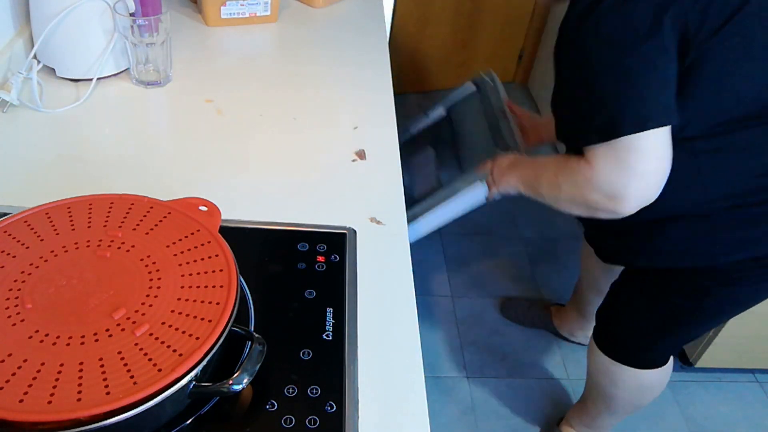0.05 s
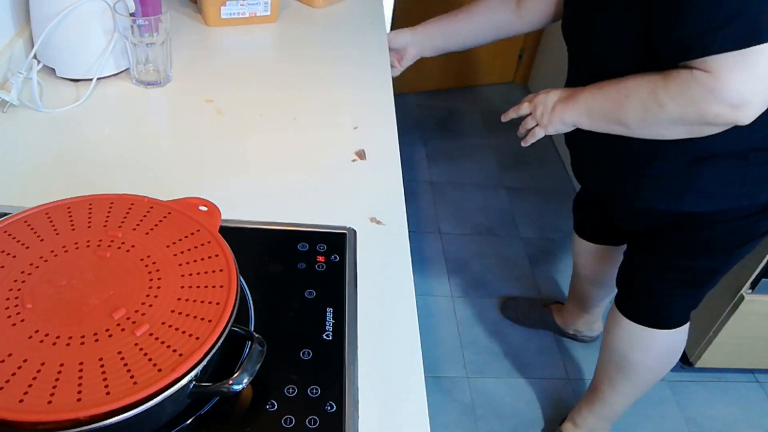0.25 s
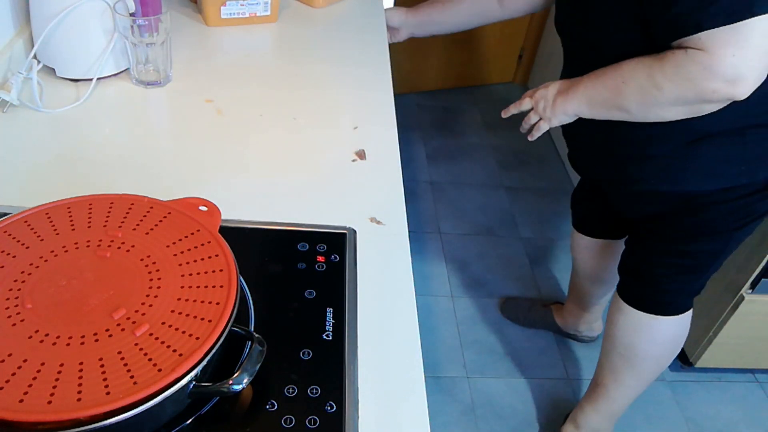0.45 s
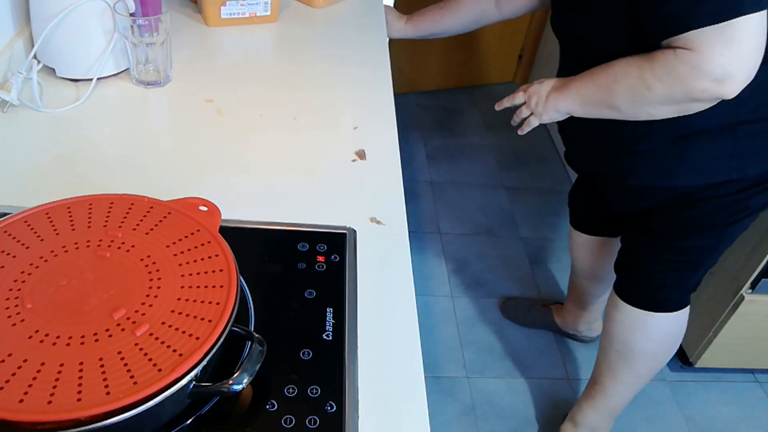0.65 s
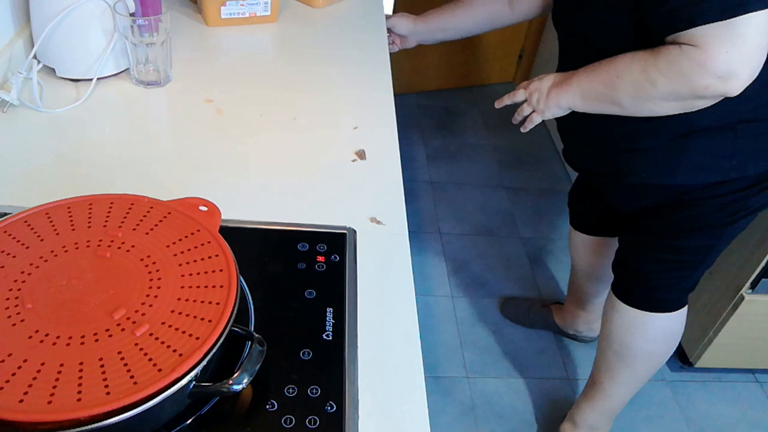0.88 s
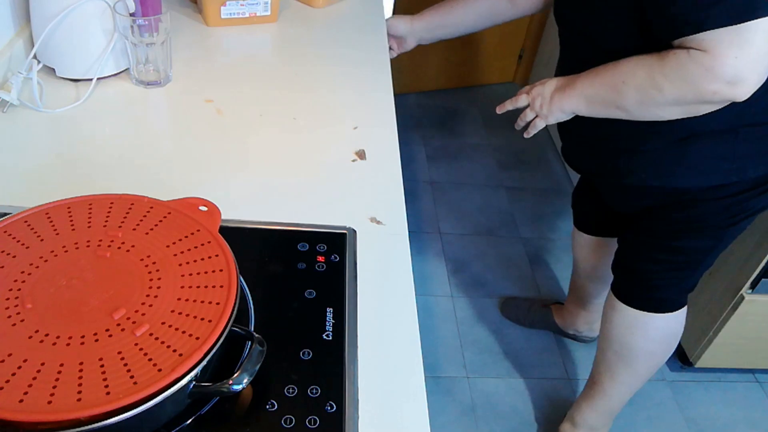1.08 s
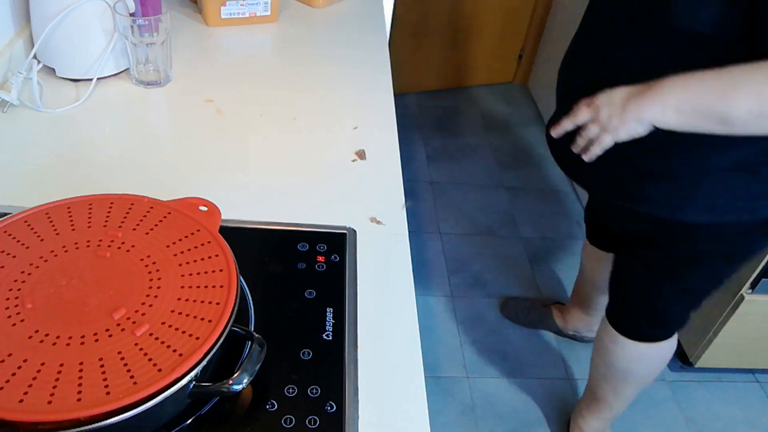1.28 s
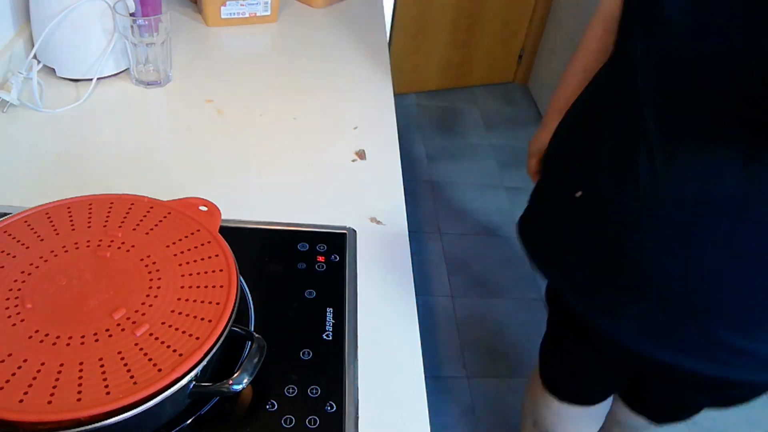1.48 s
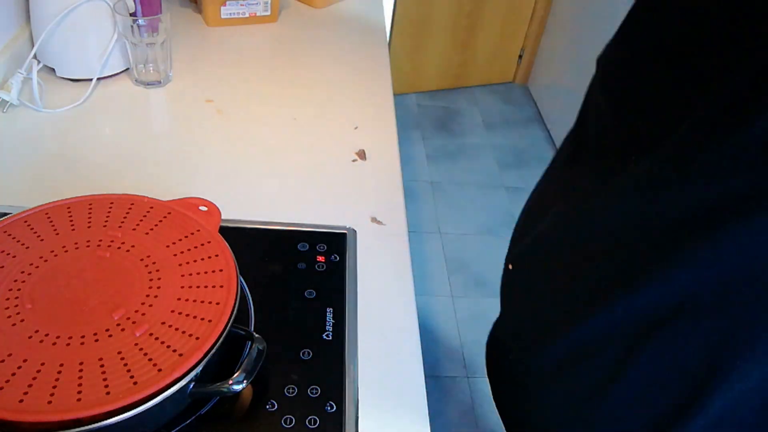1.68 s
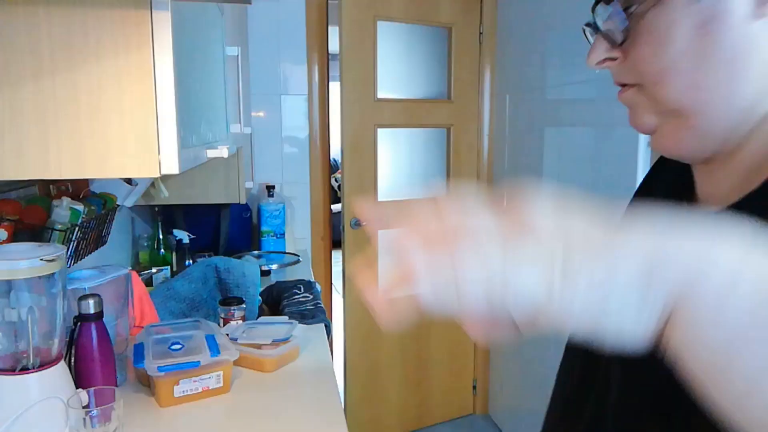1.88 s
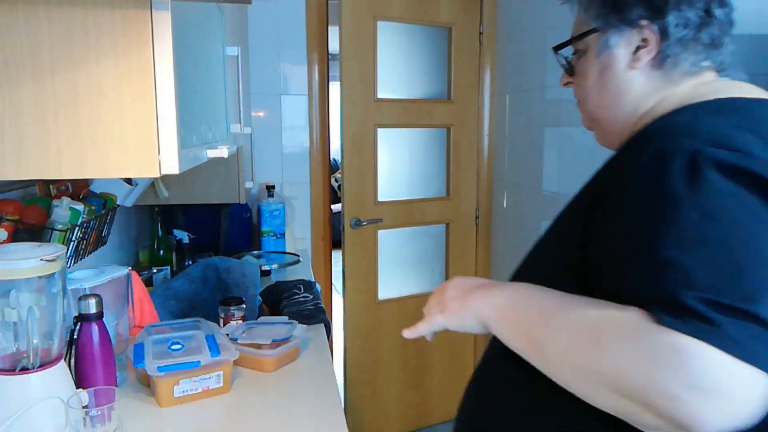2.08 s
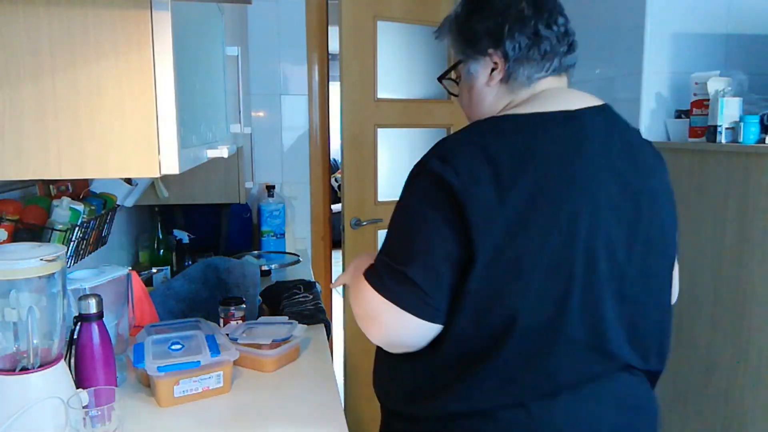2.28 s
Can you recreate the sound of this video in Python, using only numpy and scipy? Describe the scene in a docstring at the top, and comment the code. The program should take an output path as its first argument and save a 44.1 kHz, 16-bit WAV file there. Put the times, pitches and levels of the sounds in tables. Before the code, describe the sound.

A dishwasher rack squeaks on its rail and bangs home twice with a bright rattle in a quiet kitchen; soft rustles follow, then a faint motor jolts on, whines, cuts out and returns lower.

```python
"""Kitchen: faint appliance hum, room hiss (shaped noise) and small rustles (noise puffs).
A dishwasher rack squeaks on its rail (stick-slip harmonics) and knocks home twice (struck modes, rattle).
A small motor starts with a jolt (grains and blows into resonances) and whines (wavering harmonics).
The sound drops out for a moment and comes back with a thump (level step) on a lower motor note."""
import sys
import numpy as np
from scipy import signal
from scipy.fft import rfft, irfft
from scipy.io import wavfile

SR = 44100
rng = np.random.default_rng(int(sys.argv[2]) if len(sys.argv) > 2 else 0)


def master_out(mix):
    """Clip the mix to full scale and print it as 16-bit PCM to the path in sys.argv[1]."""
    frames = np.transpose(np.atleast_2d(mix))
    ceiling = np.clip(frames, -1, 1)
    pcm = np.round(ceiling * 32767).astype(np.int16)
    wavfile.write(sys.argv[1], SR, pcm)


def volts_from_db(level):
    """Convert decibel levels to linear amplitude ratios."""
    exponent = np.asarray(level, float) / 20
    return 10 ** exponent


N = 103458

# Room hiss at rest, motor running, after the drop-out. Each row: frequency in Hz, relative density in dB per Hz.
QUIET_HISS = [(18, -60.5), (30, -19), (70, -14.5), (130, -22), (233, -18.5), (266, -23.5), (303, -4.5),
              (336, -11.5), (1070, -22), (1190, -18.5), (1280, -21.5), (2350, -22), (16000, -33)]
BUSY_HISS = [(18, -52), (30, -26), (174, -26), (303, -21.5), (632, -12), (702, -9.5), (1100, -25.5),
             (1190, -19.5), (2170, -21.5), (2900, -20), (16000, -32.5)]
AFTER_HISS = [(18, -52.5), (30, -11.5), (100, -25.5), (161, -10), (426, -13), (486, -12.5), (721, -19.5),
              (1460, -23), (1910, -23.5), (2680, -21), (16000, -32)]
# Hiss while the motor runs. Each row: time in seconds, level in dB before BUSY_LIFT_DB.
BUSY_HISS_LEVEL = [(1.2, -62.5), (1.404, -60.5), (1.65, -58), (1.662, -60), (1.88, -59)]
# Swell of the resting hiss. Each row: time in seconds, gain in dB over QUIET_DB.
QUIET_HISS_SWELL = [(0, 6.5), (0.14, 6.5), (0.4, 2.5), (1.17, 1), (1.9, 8)]
# Stereo noise and tones. Each row: frequency in Hz, left-right likeness from -1 to 1.
STEREO_LIKENESS = [(60, 0.69), (120, 0.98), (240, 0.99), (480, 0.94), (950, 0.85), (1890, -0.11),
                   (3770, -0.18), (7520, 0.036), (15000, -0.1)]
# Stereo noise. Each row: frequency in Hz, left minus right in dB.
STEREO_TILT = [(60, -1), (240, 0.0), (950, 3.5), (3770, 1), (15000, 2.5)]
# Appliance hum. Each row: frequency in Hz, rms level in dB.
HUM_TONES = [(152, -78), (231.5, -75.5), (301.8, -66.5), (472, -74), (606, -76.5), (1211, -71),
             (1701, -79.5), (2121, -74), (2272, -77), (2369, -74)]
# Motor harmonics. Each row: multiple of the note, relative level in dB.
WHINE_ORDERS = [(3, -0.5), (4, -8.5), (5, -23), (6, -14.5), (7, -22.5), (8, -26), (9, -16), (10, -16.5),
                (11, -23)]
DRONE_ORDERS = [(1, -0.5), (2, -6.5), (3, 0), (4, -14), (5, -14), (6, -19), (7, -15.5), (8, -26), (9, -12),
                (10, -18.5), (11, -16), (12, -31.5), (13, -15.5)]
# Odd multiples of the whine from the third. Each row: time in seconds, level in dB.
WHINE_ODD_LEVEL = [(1.22, -58), (1.25, -47), (1.256, -40.5), (1.27, -43.5), (1.276, -56), (1.44, -53.5),
                   (1.52, -54.5), (1.6, -53), (1.75, -50), (1.8, -51), (1.85, -52.5), (1.87, -44.5),
                   (1.885, -44.5)]
# First multiple, arriving later. Each row: time in seconds, level in dB.
WHINE_FIRST_LEVEL = [(1.28, -71), (1.348, -77), (1.382, -73), (1.412, -78), (1.448, -67), (1.518, -69),
                     (1.54, -59), (1.56, -77), (1.596, -51.5), (1.628, -61), (1.71, -51.5), (1.73, -59),
                     (1.752, -53), (1.885, -65)]
# Higher even multiples. Each row: time in seconds, level in dB before a 10 dB lift.
WHINE_EVEN_LEVEL = [(1.28, -60), (1.292, -78), (1.432, -69.5), (1.51, -63.5), (1.885, -64)]
# Second multiple, swelling and sinking. Each row: time in seconds, level in dB.
WHINE_SECOND_LEVEL = [(1.28, -68), (1.31, -60.5), (1.498, -75), (1.528, -60), (1.628, -74), (1.676, -66),
                      (1.788, -58.5), (1.82, -69), (1.86, -56), (1.885, -60)]
# Lower motor note. Each row: time in seconds, level in dB.
DRONE_NOTE_LEVEL = [(2.0, -55), (2.1, -54.5), (2.3, -51.5), (2.35, -56.5)]
# Squeak glide. Each row: time in seconds, fundamental in Hz before roughness, level in dB.
SQUEAK_GLIDE = [(0.15, 862, -62.5), (0.164, 839, -47.5), (0.169, 817, -41.5), (0.18, 774, -38),
                (0.19, 767, -34.5), (0.198, 788, -39.5), (0.205, 810, -41.5)]
# Squeak harmonics. Each row: multiple, relative level in dB.
SQUEAK_HARMONICS = [(1, -2.5), (2, -7.5), (3, -14), (4, -21), (5, -15), (6, -20), (7, -25.5), (8, -27)]
# Rack contacts. Each row: start in seconds, boom and body in dB before RATTLE_DB, treble in dB,
# brightest frequency in Hz, body t60 in seconds.
RACK_KNOCKS = [(0.145, -71.5, -48.5, -36.5, 7250, 0.091), (0.156, -77, -37.5, -38.5, 4500, 0.082),
               (0.2035, -54.5, -32.5, -30, 8300, 0.18), (0.213, -38.5, -26.5, -29, 8320, 0.12),
               (0.232, -46.5, -44, -43.5, 6840, 0.19), (0.25, -37.5, -39, -51.5, 6000, 0.14),
               (0.266, -37.5, -23, -21, 6150, 0.089), (0.273, -31, -26.5, -21.5, 6200, 0.069),
               (0.291, -28.5, -35, -32, 5400, 0.066), (0.304, -35.5, -41.5, -39, 5500, 0.044),
               (0.319, -35.5, -49, -61, 3000, 0.1)]
# Rattle, low and mid, then treble. Each row: frequency in Hz, relative density in dB per Hz.
RATTLE_COLOUR = [(24, -52), (40, -21.5), (124, -29.5), (226, -2), (382, -7.5), (433, -22.5), (529, -12),
                 (680, -9), (918, -26.5), (1210, -11), (2770, -20.5), (6820, -25.5), (7930, -28),
                 (13100, -20.5), (16000, -40)]
RATTLE_TREBLE = [(1470, -38), (2500, -9), (3010, -3.5), (4160, -6), (4820, -2.5), (6820, -7), (8140, -9),
                 (11700, -5.5), (13100, -0.5), (15800, -11)]
# Cloth and crockery. Each row: start in seconds, hold in seconds, level in dB, centre in Hz.
RUSTLE_PUFFS = [(0.055, 0.032, -61, 7000), (0.1, 0.022, -58, 1200), (0.102, 0.013, -57, 4970),
                (0.485, 0.031, -69, 8000), (0.58, 0.024, -62, 6800), (0.629, 0.028, -66.5, 7000),
                (0.735, 0.022, -60.5, 6730), (0.763, 0.021, -61, 6800), (0.798, 0.026, -60, 6900),
                (0.865, 0.013, -60.5, 7460), (0.897, 0.016, -55.5, 5700), (0.892, 0.023, -61, 1500),
                (0.589, 0.019, -62.5, 1940), (0.797, 0.022, -62.5, 1760), (1.162, 0.018, -60.5, 6300),
                (1.327, 0.022, -60, 6500), (2.264, 0.034, -57.5, 4900)]
# Rustle resonances. Each row: frequency in Hz, gain in dB.
RUSTLE_RESONANCES = [(4500, 9), (7900, 4)]
# Short clatter. Each row: frequency in Hz, relative density in dB per Hz.
CLATTER_COLOUR = [(710, -40), (1500, -8), (2100, 0.5), (2600, -4), (3080, 1.5), (4200, -19), (5000, -3),
                  (6030, -3), (7100, -0.5), (7910, -14), (9930, -11.5), (15200, -16), (16000, -23)]
# Motor grinding. Each row: time in seconds, level in dB.
JOLT_LEVEL = [(1.198, -49), (1.205, -49), (1.23, -48), (1.262, -49), (1.27, -48.5), (1.28, -73)]
# Housing resonances. Each row: frequency in Hz, width in Hz, relative level in dB.
JOLT_MODES = [(376, 32, -7.5), (530, 60, -10), (667, 86, -0.5), (928, 68, -9.5), (1200, 60, -14.5),
              (1466, 87, -8), (2240, 110, -13), (3000, 100, -23)]
# Separate jolt contacts. Each row: time in seconds, drive in dB before random spread.
JOLT_BLOWS = [(1.201, -42), (1.2105, -40.5), (1.224, -42), (1.216, -44), (1.2345, -39), (1.2385, -40),
              (1.248, -41), (1.254, -40), (1.267, -43)]
# Cabinet's slow shudders. Each row: start in seconds, level in dB.
CABINET_THUDS = [(0.205, -56), (0.261, -42), (0.306, -47), (0.36, -57)]
# Low grumble under the motor. Each row: time in seconds, level in dB before a 3.5 dB cut.
MOTOR_RUMBLE = [(1.3, -71), (1.348, -77), (1.438, -76), (1.468, -82), (1.51, -56), (1.792, -61.5),
                (1.82, -54), (1.846, -66), (1.885, -55)]
# Motor whistles. Each row: start and end in seconds, frequency in Hz, width in Hz, level in dB.
MOTOR_WHISTLES = [(1.274, 1.497, 1655, 20, -64.5), (1.27, 1.38, 2270, 88, -62.5),
                  (1.367, 1.48, 2294, 54, -59), (1.704, 1.926, 4050, 73, -66.5),
                  (1.785, 1.855, 5820, 127, -61.5), (1.835, 1.9, 6120, 150, -61.5),
                  (1.75, 1.9, 4840, 300, -64.5), (1.77, 1.9, 2125, 17, -65)]
# Rack on the rail stop, rack home in the cabinet. Each row: time in seconds, drive in dB before random spread.
RAIL_STOP_BLOWS = [(0.206, -28.5), (0.2135, -25), (0.2165, -22), (0.2195, -28.5), (0.2225, -32.5),
                   (0.238, -32.5), (0.257, -33)]
CABINET_HOME_BLOWS = [(0.2685, -24.5), (0.273, -23), (0.2765, -23), (0.2805, -26.5), (0.2895, -24),
                      (0.3025, -26.5), (0.317, -36), (0.329, -35), (0.345, -44.5), (0.36, -45)]
# Their modes. Each row: frequency in Hz, relative level in dB, t60 in seconds.
RAIL_STOP_MODES = [(288, -20.5, .06), (370, -11.5, 0.058), (530, -13, 0.049), (670.6, -1, 0.04),
                   (1000, -14, 0.045), (1232, -6, .05), (1475, -8.5, 0.044), (1653, -15.5, 0.043),
                   (1945, -15, .04), (2618, -18, 0.062)]
CABINET_MODES = [(163.7, -15, 0.079), (226.2, -5.5, .11), (292, -4.5, 0.057), (366, -12, .1),
                 (460, -19, .08), (541, -10.5, 0.12), (600, -14.5, .09), (699, -13, 0.1),
                 (1032, -21, 0.063), (1242, -12, 0.035), (1500, -11, 0.026), (1810, -17.5, 0.027),
                 (2590, -16.5, .05)]

QUIET_DB, BUSY_LIFT_DB, AFTER_DB = -66, 3.5, -54
HUM_WAVER_DB, MOTOR_WAVER_DB = 1.0, 1.5
MOTOR_ON_S, DROP_S, BACK_S = 1.198, 1.8865, 2.0125
SWAP_S = BACK_S - .05  # backgrounds change over inside the drop-out
WHINE_HZ, DRONE_HZ = 235.6, 161.8
SQUEAK_ROUGH, SQUEAK_HISS_DB = .014, -10
ATTACK_S, BOOM_LONGER, TREBLE_SHORTER = 0.0032, 1.22, 0.82
BRIGHT_DB, BRIGHT_OCTAVES = 8, 0.42
RATTLE_DB, CONTACTS_PER_S, BOOM_CUT_HZ = -4.5, 2000, 160
THUD_HZ, THUD_RISE_S, THUD_T60_S = 68.6, .008, 0.16
BLOW_SPREAD_DB, CONTACT_HZ = 1.4, 2460
STOP_CUT_HZ, CABINET_CUT_HZ, JOLT_CUT_HZ = 320, 175, 340
RUSTLE_OCTAVES = 1.13
CLATTER_S, CLATTER_LENGTH_S, CLATTER_T60_S, CLATTER_DB = 1.6272, 0.0317, 0.16, -40.5
JOLT_HISS_DB, JOLT_END_S = -2, 1.274
ROOM_T60_S, ROOM_DB = 0.13, -17
FADE_DB, FADE_S = -44, 0.0048  # fade-out: drops to FADE_DB, then sinks 14 dB per FADE_S
THUMP_STEP, THUMP_DECAY_S = -0.021, 0.038  # full scale; time constant


def rms_one(x):
    """Scale to rms 1."""
    return x / np.sqrt(np.mean(x ** 2) + 1e-20)


def curve(rows, column=1):
    """One column of a time table at every sample."""
    return np.interp(np.arange(N) / SR, np.array(rows)[:, 0], np.array(rows)[:, column])


def at_hz(points, hz):
    """A spectrum table read on a log-frequency axis."""
    return np.interp(np.log(hz), np.log(np.array(points)[:, 0]), np.array(points)[:, 1])


def drift(rate_hz):
    """Twice low-passed noise of rms about 1, made at SR / 40."""
    r = np.exp(-80 * np.pi * rate_hz / SR)
    noise = rng.standard_normal(N // 40 + 2002)
    slow = signal.lfilter([1], [1, -2 * r, r * r], noise)[2000:]
    return np.interp(np.arange(N) / 40, np.arange(len(slow)), rms_one(slow))


def shaped(x, db_at):
    """Colour by a law of dB against Hz."""
    hz = np.maximum(np.arange(N // 2 + 1) * SR / N, 1)
    return irfft(rfft(x) * volts_from_db(db_at(hz)), N)


def wide(db_at):
    """Stereo noise with the room's likeness and tilt; rms 1."""
    hz = np.maximum(np.arange(N // 2 + 1) * SR / N, 1)
    alike = np.clip(at_hz(STEREO_LIKENESS, hz), -.99, .99)
    mid, side = rfft(rng.standard_normal((2, N)))
    both = np.sqrt(1 + alike) * mid + np.sqrt(1 - alike) * side * [[1], [-1]]
    tilt_db = at_hz(STEREO_TILT, hz) * [[.5], [-.5]]
    return rms_one(irfft(both * volts_from_db(db_at(hz) + tilt_db), N))


def ring(x, hz, t60_s):
    """Two-pole resonance: one mode set ringing by x."""
    r, w = volts_from_db(-60 / (t60_s * SR)), 2 * np.pi * hz / SR
    return signal.lfilter([0, np.sin(w)], [1, -2 * r * np.cos(w), r * r], x + 1e-18)


def side_phase(hz):
    """Phase between the sides that gives the likeness at hz, in radians."""
    return np.arccos(np.clip(at_hz(STEREO_LIKENESS, hz), -1, 1))


def tone(hz, db, waver_db, rate_hz):
    """A stereo sine of wavering level, the sides apart in phase."""
    phase = 2 * np.pi * (np.cumsum(hz + np.zeros(N)) / SR + rng.random())
    apart = side_phase(np.mean(hz)) / 2
    level = np.sqrt(2) * volts_from_db(db + waver_db * drift(rate_hz))
    return level * np.sin(phase + apart * np.array([[1], [-1]]))


def grains(rate_per_s):
    """Dense uneven clicks of random sign; rms 1."""
    hit = rng.random(N) < rate_per_s / SR
    return rms_one(hit * volts_from_db(3.36 * rng.exponential(1, N)) * rng.choice([-1, 1], N))


def low_cut(x, hz):
    """Small bodies radiate little bass."""
    return signal.sosfilt(signal.butter(2, hz, "high", fs=SR, output="sos"), x)


def struck(blows, modes):
    """Soft (low-passed) contacts set every mode ringing; a lag sets the sides apart."""
    out, at = 0, (np.array(blows)[:, 0] * SR).astype(int)
    r = np.exp(-2 * np.pi * CONTACT_HZ / SR)
    for hz, db, t60_s in modes:
        clicks = np.zeros(N)
        spread_db = BLOW_SPREAD_DB * rng.standard_normal(len(at))
        clicks[at] = volts_from_db(np.array(blows)[:, 1] + db + spread_db)
        mono = ring(signal.lfilter([1 - r], [1, -r], clicks), hz, t60_s)
        lag = int(side_phase(hz) / (2 * np.pi * hz) * SR)
        out = out + np.array([np.roll(mono, lag), mono])
    return out


def quiet_kitchen():
    """Room hiss as shaped noise, appliance hum as wavering sines."""
    hiss = volts_from_db(QUIET_DB + curve(QUIET_HISS_SWELL)) * wide(lambda hz: at_hz(QUIET_HISS, hz))
    return hiss + sum(tone(hz, db, HUM_WAVER_DB, 8.0) for hz, db in HUM_TONES)


def puff(start_s, hold_s):
    """Quick rise, hold, quick fall."""
    t = np.arange(N) / SR
    return np.clip((t - start_s) / 0.0032, 0, 1) * volts_from_db(-np.maximum(t - start_s - hold_s, 0) * 1500)


def clatter():
    """One short burst of coloured, decaying noise."""
    u = np.maximum(np.arange(N) / SR - CLATTER_S, 0)
    edges = np.clip(np.minimum(u / .0005, (CLATTER_LENGTH_S - u) / .01), 0, 1)
    level = volts_from_db(CLATTER_DB + 2.0 * drift(200) - 60 * u / CLATTER_T60_S)
    return level * edges * wide(lambda hz: at_hz(CLATTER_COLOUR, hz))


def rustles():
    """Short soft noise puffs, each a broad band with two narrow resonances."""
    out = 0
    for start_s, hold_s, db, centre_hz in RUSTLE_PUFFS:
        def colour(hz):
            band = -12 * (np.log2(hz / centre_hz) / RUSTLE_OCTAVES) ** 2
            return band + sum(g * np.exp(-(np.log2(hz / f) / 0.059) ** 2) for f, g in RUSTLE_RESONANCES)
        out = out + volts_from_db(db + 2.0 * drift(80)) * puff(start_s, hold_s) * wide(colour)
    return out


def rack_squeak():
    """Stick-slip on the rail: harmonics of a rough glide, plus hiss."""
    t = np.arange(N) / SR
    rise = np.clip((t - SQUEAK_GLIDE[0][0]) / .004, 0, 1)
    fall = np.clip((SQUEAK_GLIDE[-1][0] - t) / 0.0054, 0, 1)
    slip_hz = curve(SQUEAK_GLIDE) * (1 + SQUEAK_ROUGH * drift(170))
    squeak = sum(tone(k * slip_hz, db, 2.5 * np.sqrt(k), 60.0) for k, db in SQUEAK_HARMONICS)
    hiss = volts_from_db(SQUEAK_HISS_DB) * wide(lambda hz: -6.0 * np.log2(hz / 1000) - 30 * (hz < 900))
    return rise * fall * volts_from_db(curve(SQUEAK_GLIDE, column=2)) * (squeak + hiss)


def rack_rattle():
    """Bursts of contacts as decaying noise: boom of grains, body, bright treble."""
    t = np.arange(N) / SR
    boom, body, treble = 0, 0, 0
    for start_s, boom_db, body_db, treble_db, bright_hz, t60_s in RACK_KNOCKS:
        u = np.maximum(t - start_s, 0)
        rise = np.minimum(u / ATTACK_S, 1)
        boom = boom + volts_from_db(boom_db - 60 * u / t60_s / BOOM_LONGER) * rise
        body = body + volts_from_db(body_db - 60 * u / t60_s) * rise

        def colour(hz):
            bright = BRIGHT_DB * np.exp(-(np.log2(hz / bright_hz) / BRIGHT_OCTAVES) ** 2)
            return at_hz(RATTLE_TREBLE, hz) + bright
        treble = treble + volts_from_db(treble_db - 60 * u / t60_s / TREBLE_SHORTER) * rise * wide(colour)

    def low_band(hz):
        return at_hz(RATTLE_COLOUR, hz) - 40 * ((hz > 450) | (hz < BOOM_CUT_HZ))
    low = boom * rms_one(shaped(grains(CONTACTS_PER_S), low_band))
    mid = body * wide(lambda hz: at_hz(RATTLE_COLOUR, hz) - 40 * ((hz > 2500) | (hz < 450)))
    return volts_from_db(RATTLE_DB) * (low + mid) + treble


def rack_knocks():
    """Blows ring the modes of the rail stop, then of the cabinet."""
    stop = low_cut(struck(RAIL_STOP_BLOWS, RAIL_STOP_MODES), STOP_CUT_HZ)
    return stop + low_cut(struck(CABINET_HOME_BLOWS, CABINET_MODES), CABINET_CUT_HZ)


def cabinet_thuds():
    """The cabinet shudders: decaying low sines."""
    out = 0
    for start_s, db in CABINET_THUDS:
        u = np.maximum(np.arange(N) / SR - start_s, 0)
        level = volts_from_db(db - 60 * u / THUD_T60_S) * np.minimum(u / THUD_RISE_S, 1)
        out = out + level * np.sin(2 * np.pi * THUD_HZ * u)
    return out


def room(x):
    """Short dull stereo tail: convolution with decaying noise."""
    t = np.arange(int(.4 * SR)) / SR
    noise = wide(lambda hz: -2.0 * np.log2(hz / 1000) - 20 * (hz < 140))[:, :len(t)]
    tail = noise * volts_from_db(-60 * t / ROOM_T60_S) * (t > .004)
    tail = tail / np.sqrt(np.sum(tail ** 2, axis=1, keepdims=True))
    return volts_from_db(ROOM_DB) * signal.fftconvolve(x, tail, axes=1)[:, :N]


def jolt():
    """The motor grinds against its housing before it runs free: grains and blows into resonances."""
    t = np.arange(N) / SR
    modes = [volts_from_db(db) * rms_one(ring(grains(900), hz, 2.0 / width_hz)) for hz, width_hz, db in JOLT_MODES]
    body = low_cut(rms_one(sum(modes)), JOLT_CUT_HZ) * volts_from_db(2.0 * drift(70))
    hiss = volts_from_db(JOLT_HISS_DB) * wide(lambda hz: -2.0 * np.log2(hz / 1000) - 30 * (hz < 250))
    grind = (body + hiss) * volts_from_db(curve(JOLT_LEVEL)) * np.clip((t - MOTOR_ON_S) / 0.004, 0, 1)
    hits = struck(JOLT_BLOWS, [(hz, db, 1.54 / width_hz) for hz, width_hz, db in JOLT_MODES])
    return (grind + low_cut(hits, JOLT_CUT_HZ)) * volts_from_db(-1500 * np.maximum(t - JOLT_END_S, 0))


def motor_whine():
    """Harmonics of the first motor note, each wavering, over the motor's hiss."""
    out = volts_from_db(curve(BUSY_HISS_LEVEL) + BUSY_LIFT_DB) * wide(lambda hz: at_hz(BUSY_HISS, hz))
    out = out + tone(WHINE_HZ, curve(WHINE_FIRST_LEVEL), MOTOR_WAVER_DB, 33.0)
    out = out + tone(2 * WHINE_HZ, curve(WHINE_SECOND_LEVEL), MOTOR_WAVER_DB, 30.4)
    odd_db, even_db = curve(WHINE_ODD_LEVEL), curve(WHINE_EVEN_LEVEL) + 10
    for k, db in WHINE_ORDERS:
        out = out + tone(k * WHINE_HZ, db + (odd_db if k % 2 else even_db), MOTOR_WAVER_DB, 30.4)
    return out * (np.arange(N) / SR > MOTOR_ON_S)


def motor_whistles():
    """Faint passing whistles: narrow noise bands."""
    t, out = np.arange(N) / SR, 0
    for start_s, end_s, centre_hz, width_hz, db in MOTOR_WHISTLES:
        shape = np.clip(np.minimum(t - start_s, end_s - t) / 0.018, 0, 1)
        band = wide(lambda hz: -20 * np.log10(1 + ((hz - centre_hz) / width_hz) ** 2))
        out = out + volts_from_db(db) * shape * band
    return out


def motor_rumble():
    """A low grumble: noise around 350 Hz."""
    level = volts_from_db(curve(MOTOR_RUMBLE) - 3.5) * (np.arange(N) / SR > 1.3)
    return level * wide(lambda hz: -40 * np.abs(np.log2(hz / 350)) ** 2)


def motor_drone():
    """Wavering harmonics of the lower motor note, over hiss."""
    out = volts_from_db(AFTER_DB) * wide(lambda hz: at_hz(AFTER_HISS, hz))
    level_db = curve(DRONE_NOTE_LEVEL)
    return out + sum(tone(k * DRONE_HZ, db + level_db, MOTOR_WAVER_DB, 20.0) for k, db in DRONE_ORDERS)


def scene():
    """Everything in the kitchen; rack and jolt excite the room."""
    near = rack_squeak() + rack_rattle() + rack_knocks() + cabinet_thuds() + jolt()
    before = quiet_kitchen() + motor_whine() + motor_whistles() + motor_rumble()
    background = np.where(np.arange(N) / SR < SWAP_S, before, motor_drone())
    return near + room(near) + rustles() + clatter() + background


def roll_off(x):
    """The treble ends steeply here."""
    return signal.sosfilt(signal.butter(12, 16850, fs=SR, output="sos"), x)


def record(dry):
    """The sound drops out briefly and returns on a level step that settles."""
    t = np.arange(N) / SR
    fade_out = volts_from_db(FADE_DB - 14.0 * (t - DROP_S) / FADE_S)
    gate = np.where((t > DROP_S) & (t < BACK_S), fade_out, 1)
    u = np.maximum(t - BACK_S, 0)
    thump = THUMP_STEP * np.clip(u / 0.0001, 0, 1) * np.exp(-u / THUMP_DECAY_S)
    return roll_off(dry * gate + thump)


dry = scene()
out = record(dry)
master_out(out)
```